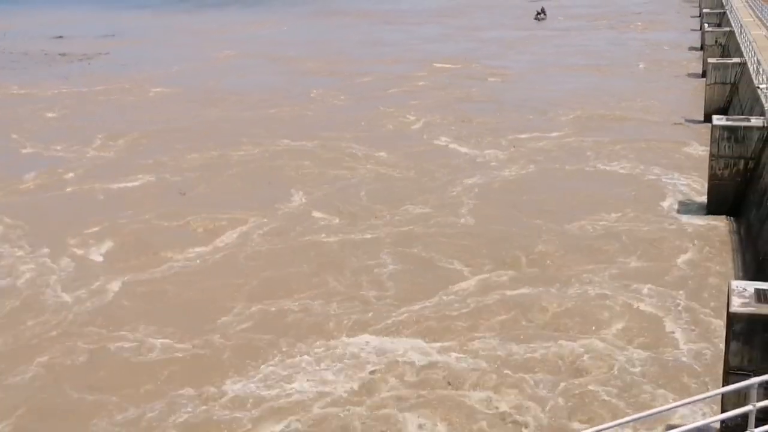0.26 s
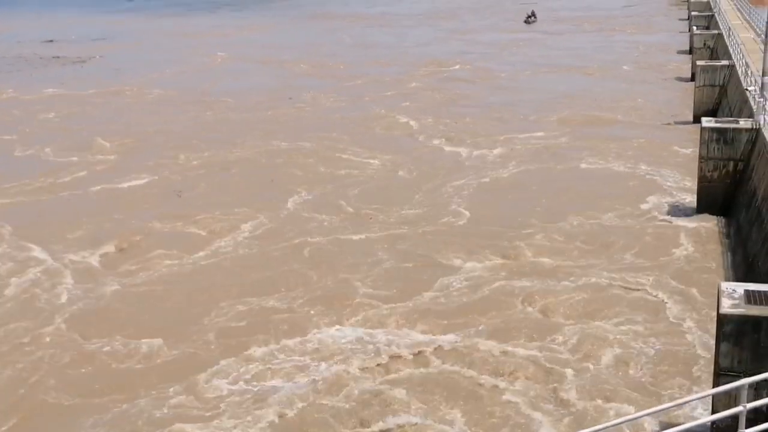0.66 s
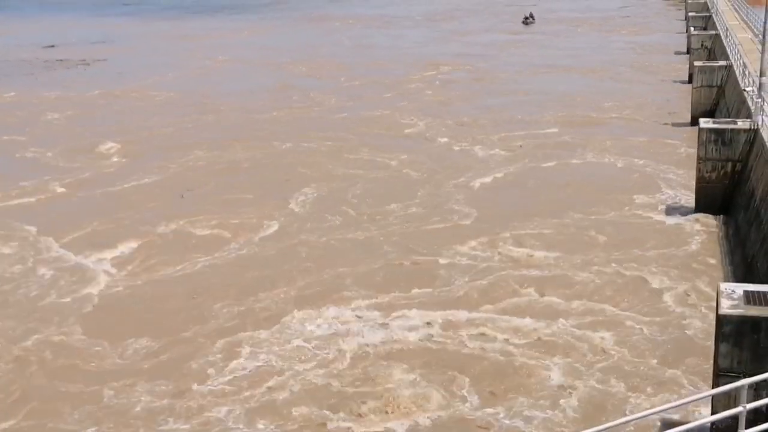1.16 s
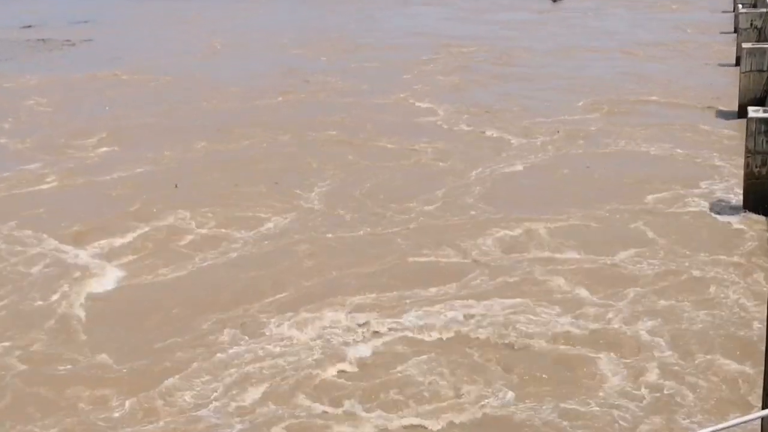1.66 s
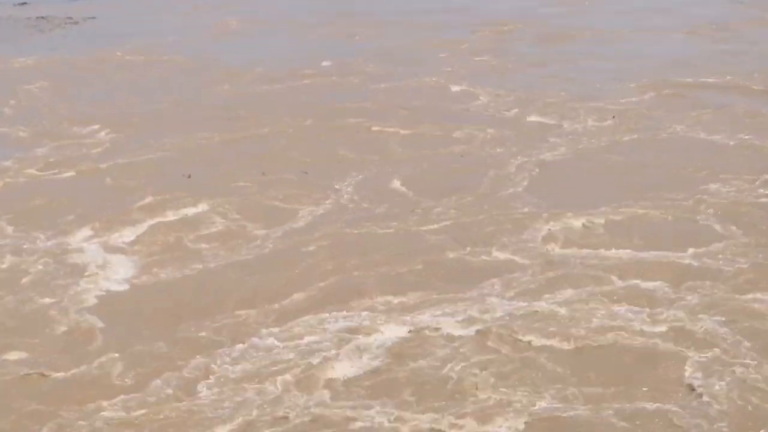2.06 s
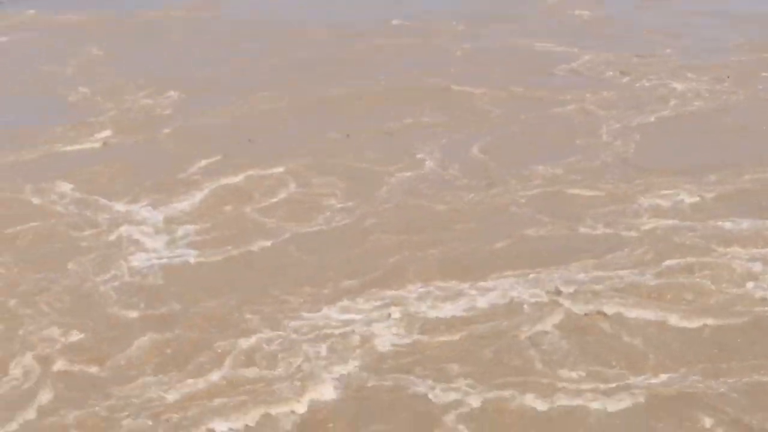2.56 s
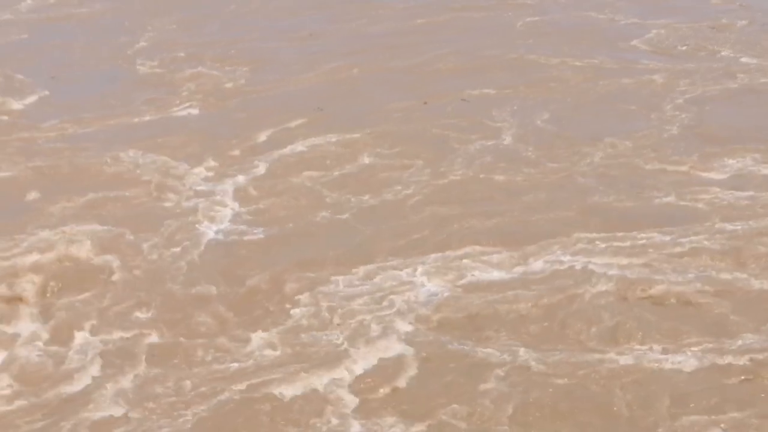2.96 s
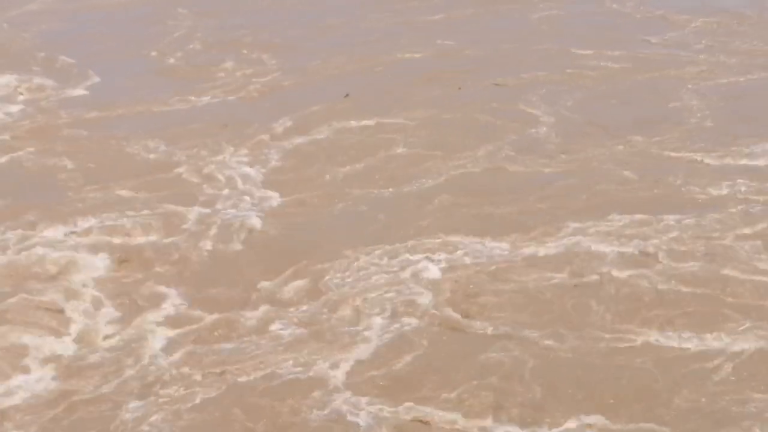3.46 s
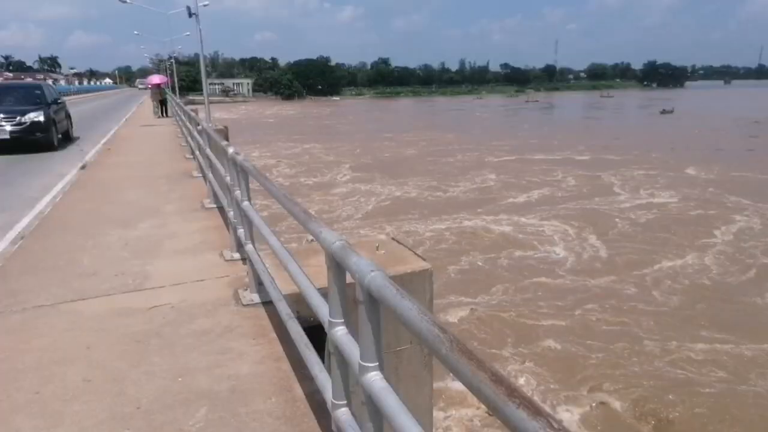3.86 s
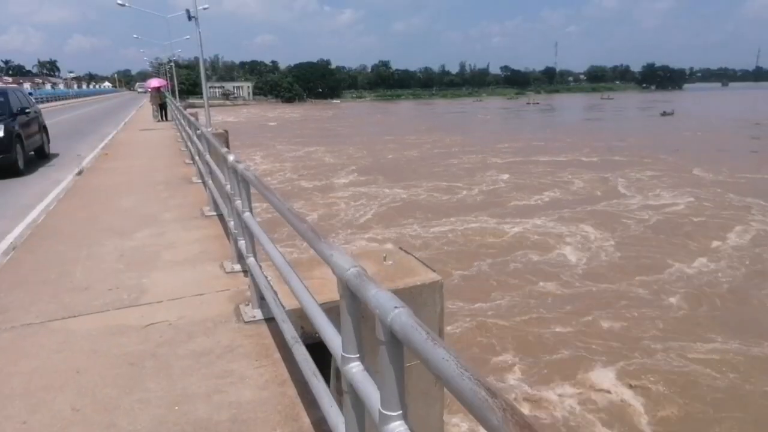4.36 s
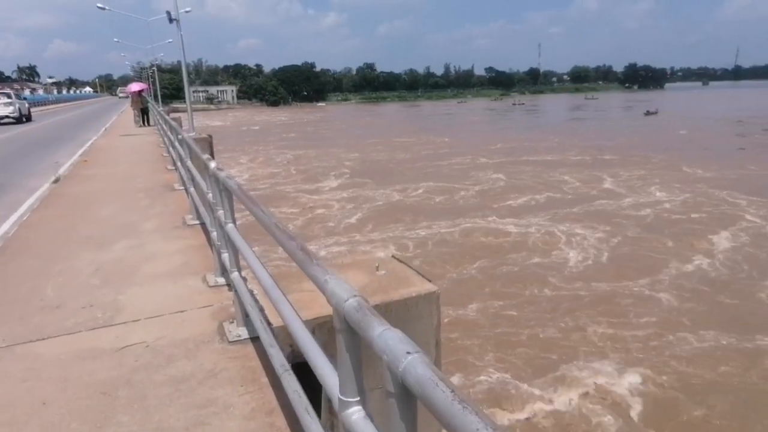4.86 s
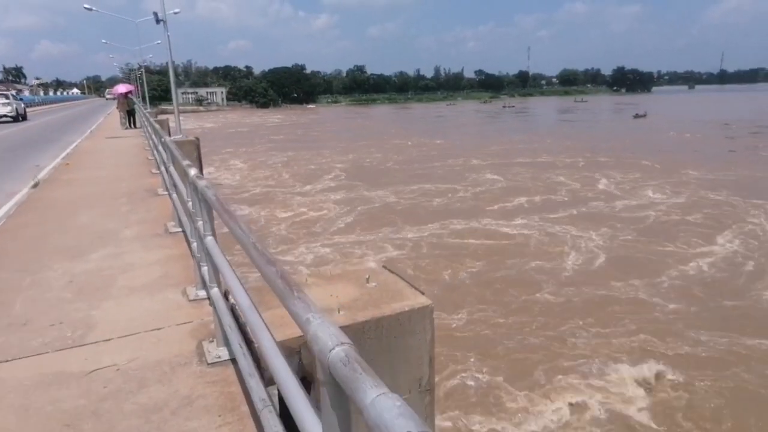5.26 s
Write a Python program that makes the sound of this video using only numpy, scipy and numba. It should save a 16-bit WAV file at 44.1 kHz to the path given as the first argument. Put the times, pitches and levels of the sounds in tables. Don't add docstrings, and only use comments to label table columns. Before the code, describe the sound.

From the start, floodwater roars close by in a broad, dense rush, with deep uneven churning and bubbly foam, louder and brighter on the right. A single-cylinder motorbike putters on the road behind, about 25 pulses a second, with brief throttle surges around 0.5-0.8 s; it passes nearest near 1.8 s, blips at 2.5 s, and pulls away hard at 3.3 s while its pulse rate slowly falls. A low lorry drone wavers underneath, stronger from about 1.4 s. Soft wind gusts brush the microphone near 0.3, 2.1 and 3.4 s. From about 2.5 s the spray grows hissier and brighter. At 3.7 s everything stops dead. At 4.1 s the roar returns abruptly, more balanced, without motorbike or lorry. Wind flutters alternate between sides, with hard left thumps at 4.6 and 4.75 s and smaller knocks around them. Faint car tyres swell around 5 s; the roar continues to the end.

```python
import sys
import numpy as np
from scipy import signal
from scipy.io import wavfile
from scipy.ndimage import map_coordinates
from numba import njit

SR = 44100
rng = np.random.default_rng(int(sys.argv[2]) if len(sys.argv) > 2 else 0)


def store_pcm(level_fs):
    pcm = np.round(np.clip(level_fs, -1, 1) * 32767).astype(np.int16)
    wavfile.write(sys.argv[1], SR, np.atleast_2d(pcm).T)


def magnitude_from_level(level_db):
    exponent = np.asarray(level_db, float) / 20
    return 10 ** exponent


N = 242550
FRAME = 1024

# start in seconds, end in seconds.
PAUSE_S = (3.690, 4.0962)
# frequency in Hz, left level in dB per Hz, right level in dB per Hz.
ROAR_DOWN = [(45, -69, -59.5), (160, -55.5, -52.5), (355, -59.5, -53.5), (550, -64.5, -60), (754, -61, -52),
             (1070, -67, -58), (1450, -69.5, -57), (2130, -68.5, -56.5), (3400, -66.5, -70.5),
             (3750, -75, -74.5), (8200, -100, -73.5), (9200, -85.5, -83.5), (11760, -97.5, -83.5),
             (14950, -99, -82)]
ROAR_TURNED = [(45.6, -66, -51.5), (160, -58, -47), (340, -56, -47), (520, -65, -55.5), (770, -59.5, -51.5),
               (1056, -61, -50.5), (1430, -71, -56.5), (2300, -70, -55), (3200, -69.5, -57),
               (3900, -69.5, -71), (7940, -99, -62), (10000, -98.5, -72), (10690, -97, -82.5),
               (15000, -102, -77)]
ROAR_ALONG = [(45, -68, -63), (160, -58, -55), (327, -58, -50.5), (570, -66, -58), (755, -61.5, -58),
              (970, -57.5, -56.5), (1340, -63.5, -61), (2300, -64, -60), (3260, -66.5, -61),
              (4000, -74.5, -73.5), (7150, -80.5, -76), (9360, -87.5, -81.5), (11650, -96, -81),
              (15100, -99, -83.5)]
# frequency in Hz, width in Hz, level in dB per Hz.
PORT_CAVITIES = [
    [(4980, 1300, -69.5), (6290, 1750, -56.5)],
    [(5250, 1900, -69.5), (6750, 1350, -57.5)],
    [(5140, 1550, -68.5), (5550, 2380, -63.5)],
]
# frequency in Hz, correlation from -1 to 1.
ALIKE_DOWN = [(100, .93), (400, 0.9), (560, .58), (1000, 0.39), (1250, -0.075), (1550, -.16), (2100, 0.6),
              (2600, .37), (2950, 0.051)]
ALIKE_ALONG = [(100, 1), (400, 1), (600, 0.39), (1050, 0.58), (1400, 0.52), (1900, 0.12), (2200, 0.098),
               (2900, -0.43), (4200, 0.3), (5000, 0)]
LEFT_LAG_MS = (-.03, .28)
# time in seconds, turn from 0 to 1, nearness to the roar in dB.
TURN = [(0, .25, -0.3), (.4, .13, -0.5), (1.2, 0.2, -0.65), (1.8, .13, -1.7), (2.4, 0.31, -0.8),
        (2.95, 0.61, -1.5), (3.15, 0.6, -1.35), (3.45, 0.61, -.4), (3.7, 0.77, 0.1)]
# time in seconds, share from 0 to 1.
SPRAY = [(0, .25), (.3, 0.03), (1.9, 0), (2.4, .25), (2.8, 0.8), (3.15, .65), (3.4, 0.94), (3.7, 0.88)]
# time in seconds, rise in dB.
SURGES = [(.08, -4.5), (.25, -3.5), (.55, 0), (.9, -2), (1.421, -0.5), (1.8, 2.5), (1.95, -2.5), (2.1, 1),
          (2.6, 0), (2.78, 1), (2.95, 2.5), (3.4, -1), (3.55, 0), (3.699, -4.5), (4.1, 1.5), (4.5, 1.2),
          (4.9, 0.5), (5.25, 2.5), (5.5, -0.5)]
# time in seconds, firings per second.
BIKE_RATE = [(0.0, 26.69), (0.7, 26.02), (1.2, 25.44), (1.6, 24.91), (2.0, 24.24), (2.5, 24.04),
             (3.0, 23.81), (3.7, 23.31)]
# time in seconds, rise in dB.
BIKE_BLIPS = [
    (.52, 5.5),
    (.78, 5.5),
    (1.1, 2.1),
    (1.23, 0.5),
    (1.63, 2),
    (2.3, 0),
    (2.53, 6),
    (2.74, -4),
    (3.33, 12),
]
# time in seconds, firing frequency in Hz, level in dB.
LORRY = [(0, 37.8, -44), (.7, 41, -42), (1.4, 38, -34), (2.2, 37.47, -35), (2.9, 38.6, -33.5),
         (3.7, 36.6, -39)]
# left level in dB, right level in dB.
BREEZE_DB = ((-50.5, -47.5), (-37, -39))
# time in seconds, length in seconds, rise in dB at left port, rise in dB at right port.
GUSTS = [
    (.27, .17, 12, 10),
    (2.056, .12, 9, 10),
    (3.42, 0.07, 8, 7),
    (4.254, .05, 10, -6),
    (4.517, 0.081, 9.5, -3),
    (4.82, 0.09, 11, 2),
    (5.093, 0.078, -2, 9),
    (5.33, 0.067, 2, 9),
    (5.5, .06, 10, -8),
]
# time in seconds, level in dB.
BUFFETS = [
    (4.252, -34),
    (4.603, -9.5),
    (4.658, -22),
    (4.719, -24),
    (4.756, -10),
    (4.821, -30),
    (4.864, -25),
]


def curve(table, t=None):
    s, *columns = np.transpose(table)
    t = np.arange(N) / SR if t is None else t
    return [np.interp(t, s, c) for c in columns]


def along_hz(table, hz):
    f, *columns = np.transpose(table)
    return np.array([np.interp(np.log(hz), np.log(f), c) for c in columns])


def band(x, lo_hz, hi_hz):
    y = signal.sosfilt(signal.butter(2, [lo_hz, hi_hz], "band", fs=SR, output="sos"), x)
    return y / y.std()


def swells(times, sizes_db, length_s, t):
    return sum(db * np.exp(-((t - s) / w) ** 2) for s, db, w in np.broadcast(times, sizes_db, length_s))


def car():
    passes_s, near_s, level_db = 5.0, .3, -35.5
    t = np.arange(N) / SR
    near = 1 / (1 + ((t - passes_s) / near_s) ** 2)
    tyres = band(rng.standard_normal(N), 380, 600)
    return tyres * near * magnitude_from_level(level_db) * magnitude_from_level(np.array([[-1.5], [1.5]]))


def lorry():
    hz, db = curve(LORRY)
    phase = 2 * np.pi * np.cumsum(hz) / SR
    waver = 1 + .15 * band(rng.standard_normal(N), 2.0, 6.6)
    drone = np.sin(phase) + 0.28 * np.sin(1.5 * phase)
    return np.sqrt(2) * magnitude_from_level(db) * waver * drone * magnitude_from_level(np.array([[-6.0], [3.5]]))


def eddy():
    flutter_db = 1.9 * band(rng.standard_normal(N), 4.0, 24.0)
    return band(rng.standard_normal(N) * magnitude_from_level(flutter_db), 28, 130)


def wind():
    eddies = [eddy() for _ in range(2)]
    t = np.arange(N) / SR
    times, lengths, *rises_db = np.transpose(GUSTS)
    after = 1 * (t > np.mean(PAUSE_S))
    breeze_db = np.transpose(BREEZE_DB)[:, after]
    gusts_db = [swells(times, db, lengths, t) for db in rises_db]
    out = magnitude_from_level(breeze_db + gusts_db) * eddies
    for s, db in BUFFETS:
        suck = np.exp(-((t - s) / 0.0021) ** 2)
        swing_back = 0.5 * np.exp(-((t - s - .008) / .0045) ** 2)
        out[0] += magnitude_from_level(db) * (swing_back - suck)
    return out


def motorbike():
    pipe_hz, pipe_shift = 132, 0.39
    passes_s, near_db, speed_m_s, lane_m = 1.84, -22.5, 8.6, 6.54
    fade_db = 28
    rate = curve(BIKE_RATE)[0]
    turns = np.cumsum(rate) / SR - .42
    firing = np.floor(turns).astype(int) + 1
    size, shift, pitch = (rng.standard_normal((N // 1000, 3)) * [1, .006, .015])[firing].T
    s = (turns % 1 - .5 + shift) / 25.0
    valve = np.exp(-np.abs(s / 0.01) ** 5.5)
    note_hz = pipe_hz * (rate / 24.4) ** pipe_shift * (1 + pitch)
    sagging_s = s - 10.0 * s ** 2
    pipe = -np.sin(2 * np.pi * note_hz * sagging_s) * valve * magnitude_from_level(0.4 * size)
    puff = 0.17 * np.exp(-(s / 0.013) ** 2)
    puff += 0.11 * np.sin(2 * np.pi * 215 * s) * np.exp(-((s + 0.0044) / .006) ** 2)
    beat = pipe + puff - np.mean(puff)
    t = np.arange(N) / SR
    far = 1 + (speed_m_s * (t - passes_s) / lane_m) ** 2
    db = near_db - fade_db * np.log10(far) + swells(*np.transpose(BIKE_BLIPS), .06, t)
    return beat / beat.std() * magnitude_from_level(db) * magnitude_from_level(np.array([[-5.0], [4.0]]))


@njit
def ring(start, hz, size, cycles, glide, length):
    out = np.zeros(length)
    for k in range(len(start)):
        steps = int(cycles * SR / hz[k])
        z = size[k] + 0j
        p = np.exp(2j * np.pi * hz[k] / SR - 5. / steps)
        bend = np.exp(2j * np.pi * hz[k] / SR * glide / steps)
        for i in range(start[k], min(start[k] + steps, length)):
            out[i] += z.imag
            z, p = z * p, p * bend
    return out


def bubbles(lo_hz, hi_hz, spread_db, count):
    when, pitch, luck = rng.random((count, 3)).T
    hz = lo_hz * (hi_hz / lo_hz) ** pitch
    size = hz * magnitude_from_level(spread_db * np.minimum(-np.log(1 - luck), 4))
    cloud = ring((when * N).astype(np.int64), hz, size, 7.6, 0.44, N)
    return cloud / cloud.std() * np.sqrt(2 * (hi_hz - lo_hz) / SR)


def churn(hz, t, rate, octaves):
    grid = rng.standard_normal((40, 200))
    rows, columns = np.meshgrid(np.log2(hz / hz[0]) / octaves, (t - t[0]) * rate, indexing="ij")
    return map_coordinates(grid, [rows, columns], order=3, mode="mirror")


def pose(table, ports, hz):
    peaks = [magnitude_from_level(2 * db) / (1 + np.abs((hz - f) / (w / 1.815)) ** 3.6) ** 2 for f, w, db in ports]
    roar_db = 10 * np.log10(magnitude_from_level(2 * along_hz(table, hz)) + peaks)
    last_lift_db = 2.7 * np.exp(-((hz - 14700) / 500) ** 2)
    fall_db = 3.0 / (1 + np.exp((15350 - hz) / 60))
    return (roar_db + (last_lift_db - fall_db))[:, :, None]


def water():
    spray_hz, along_db = 7800, 0.55
    mist_s, mist_rise_s, mist_db, mist_hz = 2.8, .06, 2.5, 10400
    foam = [0.94 * rng.standard_normal(N) + 0.48 * bubbles(330, 6870, 2.73, count=30000) for _ in range(2)]
    hz, t, (shared, own) = signal.stft(foam, SR, nperseg=FRAME, noverlap=FRAME * 3 // 4)
    hz = np.maximum(hz, hz[1] / 2)
    rows_hz = hz[:, None]
    after = t > np.mean(PAUSE_S)

    turn, near_db = curve(TURN, t)
    spray = curve(SPRAY, t)[0]
    turn = turn + (spray - turn) / (1 + (spray_hz / rows_hz) ** 16)
    roars = (ROAR_DOWN, ROAR_TURNED, ROAR_ALONG)
    down, turned, along = (pose(roar, ports, hz) for roar, ports in zip(roars, PORT_CAVITIES))
    before_db = down + np.clip(turn, -.3, 1.3) * (turned - down) + near_db
    db = np.where(after, along + along_db, before_db)

    mist = 1 / (1 + np.exp((mist_s - t) / mist_rise_s))
    db = db + ~after * mist_db * mist / (1 + (mist_hz / rows_hz) ** 16)
    db = db + swells(*np.transpose(SURGES), 0.1, t) / (1 + (rows_hz / 500) ** 4)
    heave = 0.4 * churn(hz, t, 3.1, .8) + 0.66 * churn(hz, t, 12.0, 0.487)
    db = db + np.clip(np.minimum(500 / rows_hz, 1) ** 0.2 * heave, -6, 6)

    alike = np.where(after, along_hz(ALIKE_ALONG, hz).T, along_hz(ALIKE_DOWN, hz).T)
    alike = np.clip(alike, -1, 1)
    lag_s = np.where(after, LEFT_LAG_MS[1], LEFT_LAG_MS[0]) / 1000
    lag = np.exp(-2j * np.pi * rows_hz * lag_s)
    left = (alike * shared + np.sqrt(1 - alike ** 2) * own) * lag
    spectra = np.array([left, shared]) * magnitude_from_level(db) * np.sqrt(SR / 2)
    return signal.istft(spectra, SR, nperseg=FRAME, noverlap=FRAME * 3 // 4)[1][:, :N]


def scene():
    t = np.arange(N) / SR
    first_pose = t < np.mean(PAUSE_S)
    air = water() + wind() + (motorbike() + lorry()) * first_pose + car()
    air = signal.sosfiltfilt(signal.butter(2, 26, "high", fs=SR, output="sos"), air)
    return air * ((t < PAUSE_S[0]) | (t > PAUSE_S[1]))


def roll_off(x):
    return signal.sosfilt(signal.butter(12, 15830, fs=SR, output="sos"), x)


def record(dry):
    hz, t, z = signal.stft(dry, SR, nperseg=FRAME)
    kept = np.repeat(rng.random(len(t)) < .4, 2)[:len(t)]
    z[:, hz > 15250] *= np.array([0 * kept, kept])[:, None]
    thinned = signal.istft(z, SR, nperseg=FRAME)[1][:, :N]
    mix = np.where(dry == 0, 0, thinned)
    return roll_off(mix)


dry = scene()
out = record(dry)
store_pcm(out)
```